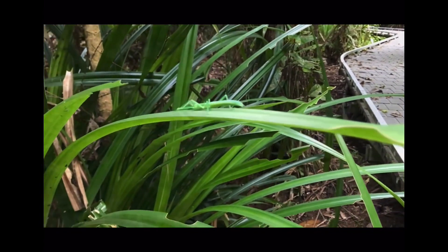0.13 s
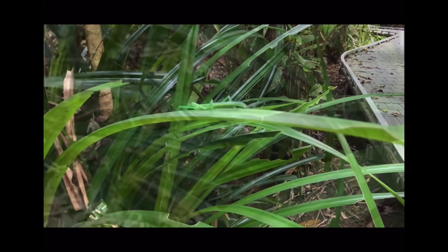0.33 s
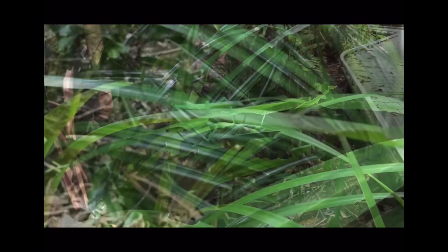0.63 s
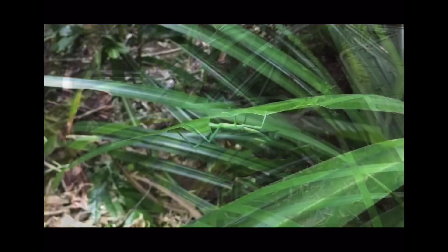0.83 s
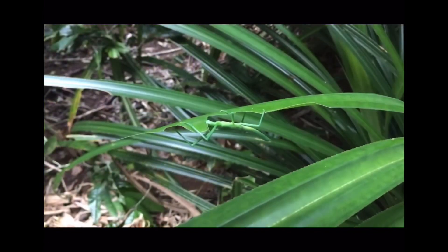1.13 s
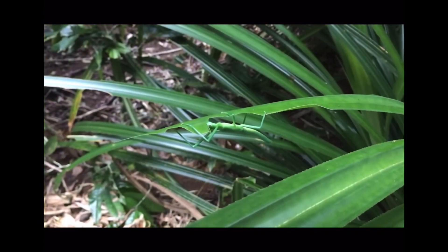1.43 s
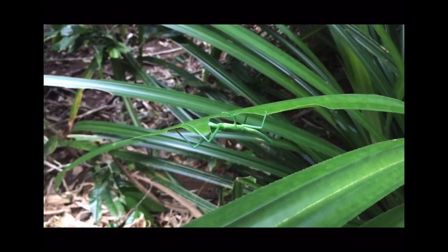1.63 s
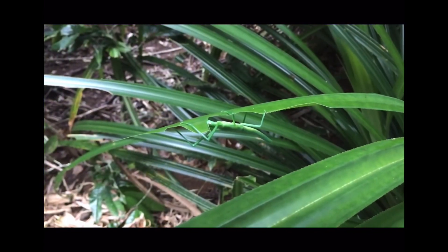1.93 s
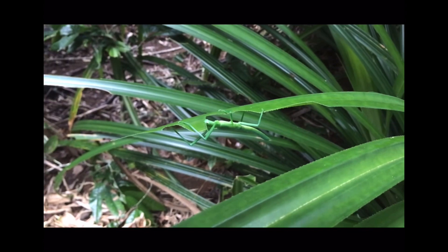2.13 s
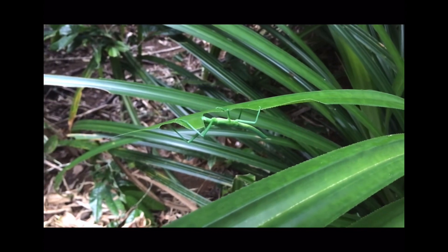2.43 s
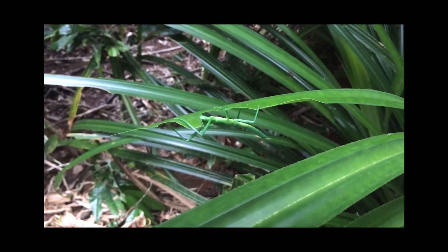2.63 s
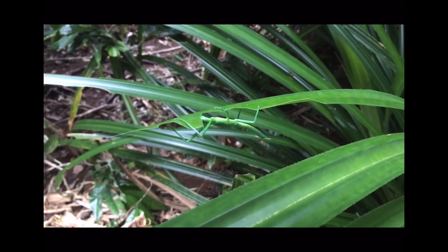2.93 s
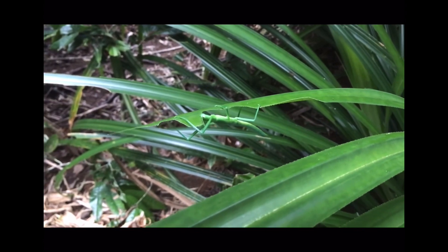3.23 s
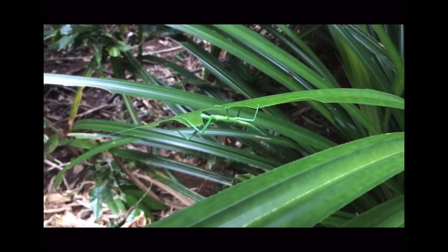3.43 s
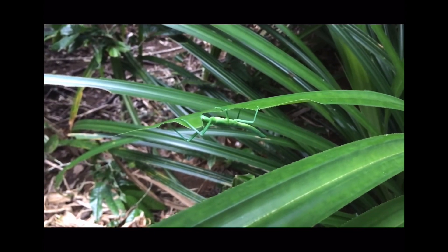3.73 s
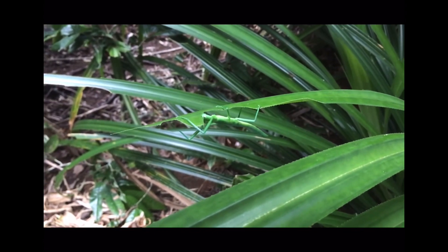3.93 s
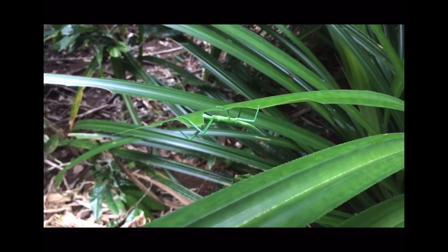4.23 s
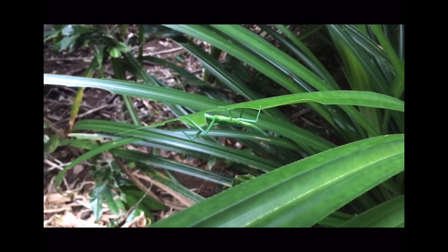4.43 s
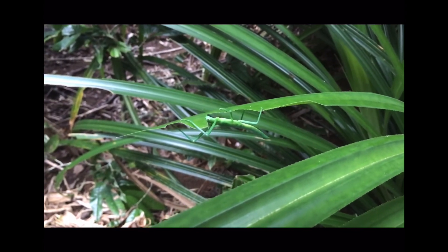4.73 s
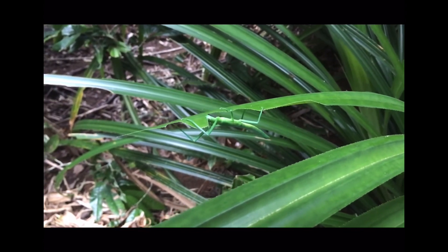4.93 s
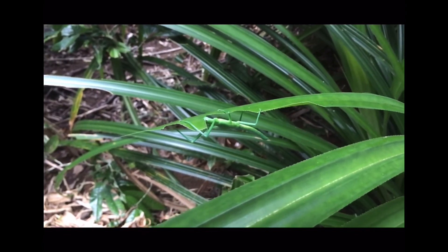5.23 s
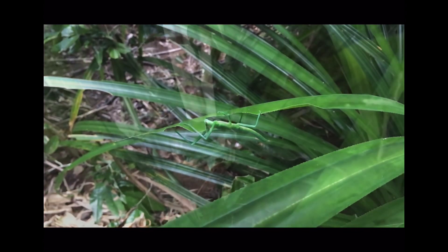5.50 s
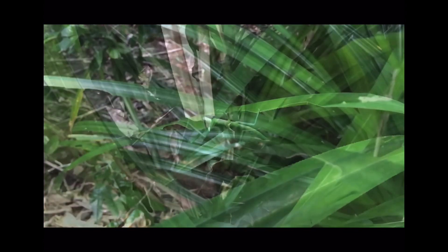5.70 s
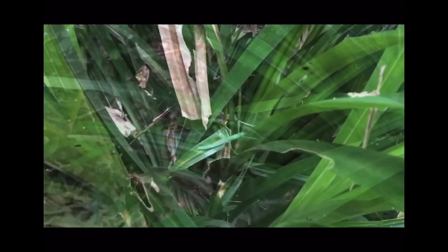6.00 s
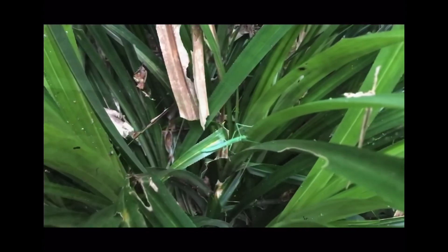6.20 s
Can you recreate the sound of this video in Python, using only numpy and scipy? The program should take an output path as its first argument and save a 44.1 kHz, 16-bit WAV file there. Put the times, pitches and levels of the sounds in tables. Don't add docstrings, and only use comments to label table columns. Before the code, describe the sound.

The opening is a quiet forest spot, soft hiss with a faint high insect band. From about 0.1 to 1.2 s it blends into a dense cicada chorus, a steady shrill drone near 9 kHz, over distant low rumble, leaf hiss and a faint narrow frog band around 2.2 kHz. Faint bird notes begin around 0.7 s; busy clusters of short whistles, falling slurs and hoarse chatter fill 1.6 to 3.6 s, strongest near 2.2 and 2.6 s. After a lull, more chirps come at 4.0 to 4.4 s, and a descending whistle run at 4.8 to 5.0 s, all echoing off trees. At 5.12 s a close cicada bursts in, louder, buzzing with distinct dry ticks. It weakens from 5.6 s and is gone by about 6.3 s. Meanwhile, trilled bird notes sound near 5.8 s and the ambience crossfades to low rumble under thinner, higher insects.

```python
import sys
import numpy as np
from scipy import signal
from scipy.fft import rfft, irfft
from scipy.io import wavfile
from scipy.ndimage import uniform_filter1d

SR = 44100
rng = np.random.default_rng(int(sys.argv[2]) if len(sys.argv) > 2 else 0)


def undo_db(level):
    steps = np.asarray(level, float) / 20
    return 10 ** steps


def persist_wave(psi):
    counts = np.round(np.clip(psi, -1, 1) * 32767).astype(np.int16)
    wavfile.write(sys.argv[1], SR, np.atleast_2d(counts).T)


N = 280476


def rms_one(x):
    return x / np.sqrt(np.mean(x ** 2) + 1e-20)


def ramp(start_s, end_s):
    return np.clip((np.arange(N) / SR - start_s) / (end_s - start_s), 0, 1)


def drift(rate_hz):
    step = 40
    pole = np.exp(-2 * np.pi * rate_hz * step / SR)
    settle = 2000
    noise = rng.standard_normal(N // step + 2 + settle)
    slow = signal.lfilter([1], [1, -2 * pole, pole * pole], noise)[settle:]
    return np.interp(np.arange(N) / step, np.arange(len(slow)), rms_one(slow))


def colour(x, spectrum, rings=()):
    hz = np.arange(N // 2 + 1) * SR / N + 1e-3
    points = np.array(spectrum)
    level_db = np.interp(np.log(hz), np.log(points[:, 0]), points[:, 1], left=-150)
    for centre_hz, width_hz, ring_db in rings:
        level_db = level_db + ring_db / (1 + (2 * (hz - centre_hz) / width_hz) ** 2)
    return rms_one(irfft(rfft(x) * undo_db(level_db), N))


def hiss(spectrum, patchy_db):
    return colour(rng.standard_normal(N), spectrum) * undo_db(patchy_db * drift(5.4))


def foliage(x, ragged_db):
    ripple = rng.standard_normal(N // 2 + 1)
    for _ in range(2):
        ripple = uniform_filter1d(ripple, size=90)
    return rms_one(irfft(rfft(x) * undo_db(ragged_db * rms_one(ripple)), N))


def tymbals(rates_hz, jitter, uneven_db, burst_s):
    clicks = np.zeros(N)
    for rate_hz in rates_hz:
        turns = np.cumsum(rate_hz * (1 + jitter * drift(8))) / SR
        buckles = np.diff(np.floor(turns), prepend=0)
        clicks += buckles * undo_db(uneven_db * rng.standard_normal(N))
    power = signal.lfilter([1], [1, -np.exp(-1 / (burst_s * SR))], clicks)
    return np.sqrt(power) * rng.standard_normal(N)


def chorus():
    # frequency_hz, density_db (per Hz)
    spectrum = [(4000, -48), (6800, -27.5), (7190, -24.5), (7660, -11.5), (8090, -2.5), (8940, 0),
                (9600, -2.5), (10500, -17), (11200, -32), (14600, -49), (22000, -120)]
    # centre_hz, width_hz, ring_db
    rings = [(8371, 30, 5), (8230, 25, 3), (8519, 30, 3), (9238, 25, 4), (9286, 25, 5), (9485, 50, 3),
             (9641, 25, 4), (9970, 25, 5), (7715, 30, 3)]
    rates_hz = [88.5, 89.5, 113, 177, 179, 227, 301, 343, 376, 446]
    clicks = tymbals(rates_hz, jitter=.01, uneven_db=2, burst_s=.0015)
    song = foliage(colour(clicks, spectrum, rings), ragged_db=2.2)
    return undo_db(-44 + .3 * drift(4)) * song


def close_cicada():
    # frequency_hz, density_db (per Hz)
    spectrum = [(3470, -63), (5900, -38), (7020, -24.5), (7350, -24), (7410, -19), (8070, -5.5),
                (8590, -3.5), (9320, -6), (9810, -12), (10100, -34), (10200, -17), (11300, -50),
                (14700, -67), (22000, -120)]
    # centre_hz, width_hz, ring_db
    rings = [(8366, 35, 8), (8274, 30, 5), (8581, 35, 4), (9022, 40, 5), (9469, 35, 6), (7704, 40, 6),
             (7951, 25, 4), (8048, 25, 4)]
    # time_s, level_db
    song = [
        (5.121, -37),
        (5.15, -33),
        (5.4, -34),
        (5.565, -35.5),
        (6.029, -43.5),
        (6.295, -57.5),
        (6.3, -63),
    ]
    ticks = [5.1216, 5.1227, 5.1242, 5.136, 5.1424, 5.1528, 5.1597, 5.1689, 5.1766, 5.186, 5.1941, 5.2241,
             5.2284, 5.2481, 5.2563, 5.2906, 5.2971, 5.3049, 5.3166, 5.3208, 5.3888, 5.3966, 5.4031, 5.4109,
             5.4374, 5.4418, 5.448, 5.4971, 5.5039, 5.5147, 5.5383, 5.5523, 5.5933, 5.6483, 5.7056, 5.7513]
    clicks = rms_one(tymbals([110.5, 120, 151.0, 268, 263, 287], jitter=0.018, uneven_db=2, burst_s=0.005))
    tick_db = 18 + 1.5 * rng.standard_normal(len(ticks))
    clicks[(np.array(ticks) * SR).astype(int)] += undo_db(tick_db)
    time_s, song_db = np.transpose(song)
    level_db = np.interp(np.arange(N) / SR, time_s, song_db)
    gate = ramp(5.12, 5.122) * (1 - ramp(6.291, 6.36))
    return gate * undo_db(level_db + 0.55 * drift(4.4)) * foliage(colour(clicks, spectrum, rings), ragged_db=2.5)


def note(row, sag, hoarse_hz, depth=0):
    start_s, length_s, pitch_hz, level_db = row
    return start_s, length_s, pitch_hz, pitch_hz * (1 - sag), level_db, hoarse_hz, depth


def notes():
    # start_s, length_s, pitch_hz, level_db
    pipes = [(0.74, 0.036, 2470, -61), (0.905, 0.03, 3970, -61), (1.263, 0.063, 4640, -56),
             (1.25, 0.19, 3190, -67), (1.599, 0.048, 2297, -53.5), (3.21, 0.035, 2880, -51.5),
             (2.038, 0.029, 4570, -57), (2.232, 0.047, 4226, -44.5), (2.24, 0.03, 5190, -61),
             (2.557, 0.036, 3010, -41.5), (2.563, 0.038, 1910, -62), (2.606, 0.04, 2930, -50.5),
             (2.654, 0.039, 3010, -45.5), (2.797, 0.067, 2790, -65), (2.986, 0.058, 2892, -46.5),
             (3.125, 0.065, 2640, -51.5), (3.127, 0.044, 1640, -62), (3.393, 0.06, 2820, -57.5),
             (3.425, 0.044, 3830, -50), (4.132, 0.063, 2770, -58), (4.3, .022, 1930, -59),
             (4.383, 0.038, 4256, -48.5), (4.384, 0.05, 2117, -55), (4.716, 0.048, 5850, -63),
             (4.773, 0.014, 4320, -43), (5.403, 0.025, 4150, -51.5), (5.428, 0.11, 2970, -65),
             (5.59, 0.037, 4620, -59), (4.01, 0.037, 2900, -69)]
    # start_s, length_s, pitch_hz, level_db
    slurs = [(1.082, .03, 3400, -60), (1.577, 0.033, 4400, -56.5), (1.871, 0.032, 6000, -57),
             (1.901, 0.025, 4780, -52), (2.698, 0.044, 2865, -45.5), (2.745, 0.052, 2850, -44),
             (2.758, 0.042, 4290, -54), (1.975, 0.02, 4250, -54), (3.069, 0.046, 2780, -53.5),
             (3.96, 0.014, 3200, -51), (4.333, 0.044, 2350, -55), (4.432, 0.035, 4250, -61),
             (4.79, 0.023, 4330, -51)]
    # start_s, length_s, pitch_hz, level_db
    trills = [
        (0.927, 0.047, 4330, -51),
        (3.996, 0.09, 4380, -53),
        (5.781, 0.106, 4350, -49),
        (5.894, 0.044, 4240, -48.5),
    ]
    # start_s, length_s, pitch_hz, level_db
    husky = [(1.92, 0.022, 3030, -50.5), (2.167, 0.036, 3450, -66), (2.225, 0.035, 3400, -50),
             (2.226, 0.083, 3840, -51.5), (2.381, 0.098, 4170, -56), (2.635, 0.19, 5870, -60),
             (3.044, 0.041, 2730, -50), (0.968, .09, 4245, -61.5), (1.634, 0.11, 4280, -70),
             (3.148, 0.062, 3310, -58), (3.191, 0.056, 4170, -56), (4.014, 0.024, 4630, -55),
             (4.311, 0.12, 4374, -53), (4.303, 0.151, 3820, -57.5), (4.697, 0.098, 2920, -59.5),
             (4.458, 0.24, 3760, -71), (4.685, 0.21, 3740, -58), (4.892, 0.12, 4380, -65),
             (5.371, 0.17, 3760, -56.5), (5.693, 0.1, 2666, -58.5), (5.759, 0.084, 3800, -57),
             (5.827, 0.091, 2890, -56.5)]
    # start_s, length_s, pitch_hz, level_db
    chatter = [(1.047, 0.32, 5480, -67.5), (1.352, 0.22, 4100, -63), (1.957, 0.033, 4900, -56),
               (2.299, 0.1, 3485, -53.5), (2.582, 0.068, 2720, -49), (6.018, 0.014, 5380, -46.5),
               (2.973, 0.076, 4110, -57.5), (3.053, 0.088, 5200, -66), (3.103, 0.16, 3080, -56.5),
               (3.362, 0.15, 5850, -64), (3.374, 0.17, 3200, -59), (4.304, 0.13, 15600, -74),
               (4.311, 0.084, 5000, -54.5), (4.331, 0.112, 2680, -58.5), (4.758, 0.27, 5920, -66),
               (4.882, 0.16, 2930, -60.5), (4.88, .1, 15600, -70), (5.052, 0.047, 3580, -74),
               (5.758, 0.14, 5070, -56.5)]
    # start_s, first_hz, last_hz, level_db
    strokes = [(3.598, 3810, 3740, -51.5), (2.665, 4160, 4200, -54), (2.693, 4340, 4660, -47),
               (2.79, 4890, 4630, -58), (3.07, 2390, 1700, -58), (1.945, 3990, 3600, -53),
               (2.601, 2850, 2100, -49), (3.624, 3990, 2250, -48.5), (4.097, 4150, 4580, -58),
               (4.313, 4350, 4650, -54), (4.693, 3170, 3020, -58), (4.783, 2690, 2210, -53),
               (5.031, 3320, 2200, -55)]
    # start_s, length_s, first_hz, last_hz, level_db
    glides = [(1.843, 0.024, 3750, 3450, -56), (1.843, 0.031, 3230, 2950, -54),
              (1.893, 0.01, 3500, 4300, -58), (1.897, 0.038, 4270, 4150, -47.5),
              (1.932, .028, 4560, 4250, -49), (2.155, 0.02, 4220, 4150, -51.5),
              (2.179, 0.051, 4060, 3740, -49.5), (2.225, 0.015, 3600, 4300, -46),
              (2.197, 0.014, 3450, 3300, -46.5), (2.21, .05, 3100, 2950, -54),
              (3.575, 0.05, 3000, 3400, -61), (2.716, 0.038, 4320, 4000, -48),
              (3.368, 0.024, 4560, 4400, -54), (3.391, 0.05, 4300, 4050, -53),
              (3.47, 0.03, 4350, 4200, -57), (3.535, .03, 4200, 4050, -57), (3.51, .016, 3320, 3600, -54),
              (3.57, 0.03, 3850, 3800, -59), (4.808, .022, 3750, 3650, -53), (4.837, .042, 4400, 4130, -51),
              (4.897, 0.045, 4030, 3850, -52), (4.941, 0.026, 3850, 3750, -46.5),
              (4.972, 0.032, 3720, 3520, -46), (5.008, 0.034, 3600, 3320, -44.5),
              (4.328, 0.029, 4520, 4420, -50.5), (4.354, 0.023, 4400, 4220, -51),
              (1.568, 0.037, 2340, 2340, -54), (4.716, 0.044, 2740, 2340, -58),
              (1.595, 0.045, 4260, 4250, -56), (1.65, 0.046, 4230, 4220, -58), (.772, .04, 4900, 4850, -69),
              (.82, .02, 4200, 4150, -66), (3.505, .022, 4200, 4150, -54), (4.345, .014, 2500, 2680, -49),
              (1.883, 0.019, 2850, 3150, -53), (2.162, 0.034, 3420, 3380, -61), (2.3, .02, 3700, 2400, -58),
              (2.335, 0.03, 2250, 2230, -60), (4.737, .034, 4330, 4200, -49)]
    # start_s, length_s, pitch_hz, level_db
    far_calls = [(4.95, .65, 1350, -73), (2.6, 0.29, 1330, -77), (3.2, .2, 1200, -77),
                 (4.1, .04, 2550, -63), (1.225, 0.042, 4620, -64), (1.37, 0.058, 3120, -64),
                 (1.955, .03, 3300, -56), (1.97, .012, 5850, -60), (1.74, .06, 5900, -66),
                 (2.3, .05, 5850, -62), (4.93, .04, 4300, -60), (3.15, .03, 3250, -58),
                 (3.1, .012, 2850, -52), (2.83, 0.055, 2800, -57)]
    calls = [note(row, sag=0.0163, hoarse_hz=28) for row in pipes]
    calls += [note(row, sag=0.0693, hoarse_hz=50) for row in slurs]
    calls += [note(row, sag=0.055, hoarse_hz=100, depth=.7) for row in trills]
    calls += [note(row, sag=.05, hoarse_hz=140) for row in husky]
    calls += [note(row, sag=.035, hoarse_hz=350.5) for row in chatter]
    stroke_s = 0.025
    calls += [(start_s, stroke_s, first, last, db, 45, 0) for start_s, first, last, db in strokes]
    calls += [(*row, 45, 0) for row in glides]
    calls += [note(row, sag=0.0163, hoarse_hz=45) for row in far_calls]
    return calls


def scatter(t60_s, size):
    tail = rng.standard_normal(size) * undo_db(-60 * np.arange(size) / SR / t60_s)
    bins = rfft(tail)
    smooth = np.sqrt(uniform_filter1d(abs(bins) ** 2, size=17))
    tail = irfft(bins / smooth, size)
    tail = tail * np.hanning(2 * size)[size:]
    return tail / np.sqrt(np.sum(tail ** 2))


def birds():
    direct = np.zeros(N)
    shake = rms_one(signal.lfilter([1], [1, -.96], rng.standard_normal(N)))
    waver_hz = 22 * drift(50)
    flutter = undo_db(4 * np.tanh(1.5 * drift(70)))
    calls = notes()
    own = rng.integers(0, N - SR, len(calls))
    trill_per_s = 33.5
    for (start_s, length_s, first_hz, last_hz, level_db, hoarse_hz, depth), skip in zip(calls, own):
        at = round(start_s * SR)
        part = np.arange(round(length_s * SR)) / (length_s * SR)
        span, luck = slice(at, at + len(part)), slice(skip, skip + len(part))
        hz = first_hz + (last_hz - first_hz) * part
        hz = hz + waver_hz[luck] + 1.507 * hoarse_hz * shake[luck]
        attack, release = part * length_s / 0.0021, (1 - part) * length_s / 0.0086
        swell = np.clip(np.minimum(attack, release), 0, 1)
        swell = swell * (1 - depth * np.cos(np.pi * trill_per_s * length_s * part) ** 2)
        swell = swell * flutter[luck] ** min(1, length_s / 0.074)
        direct[span] += undo_db(level_db) * swell * np.sin(2 * np.pi * np.cumsum(hz) / SR)
    echoes = signal.fftconvolve(direct, scatter(t60_s=.5, size=26000))[:N]
    return direct + undo_db(-2 + 1.5 * drift(60)) * echoes


def background():
    # frequency_hz, density_db (per Hz)
    rumble = [(13, -56), (22, -34), (29, -29), (41, -7), (70, 2.5), (107, -1), (146, -1), (181, -3),
              (313, -5), (419, -12), (792, -12), (883, -17.5), (967, -19.5), (1700, -20), (2210, -39),
              (3740, -120)]
    leaves = [(1000, -21), (1700, -18), (1890, -5), (2220, -0.5), (2570, -3), (2800, -3.5), (2970, -4.5),
              (3690, -4.5), (4330, -5), (5210, -10.5), (5720, -6.5), (6330, -16), (7000, -12.5),
              (9100, -29), (15400, -120)]
    frogs = [(1900, -33), (2080, 7.5), (2230, 16.5), (2400, -2), (2600, -8), (3000, -96)]
    air = [(6470, -41), (11000, 0), (11600, -7.5), (13300, -2), (15500, -13.5)]
    bed = undo_db(-54.5) * hiss(rumble, patchy_db=0.7)
    bed += undo_db(-58.5) * hiss(leaves, patchy_db=2.0)
    frog_ring = [(2224, 12, 5)]   # centre_hz, width_hz, ring_db
    bed += undo_db(-65 + 1.2 * drift(35)) * colour(rng.standard_normal(N), frogs, frog_ring)
    return bed + undo_db(-66.5 + 0.84 * drift(12)) * hiss(air, patchy_db=0)


def quiet_spot():
    # frequency_hz, density_db (per Hz)
    spectrum = [(15, -39), (25, -11), (76, -3.5), (141, -11), (181, -16.5), (258, -16.5), (309, -23),
                (751, -26.5), (874, -32), (1040, -29), (1380, -30.5), (5040, -34), (7010, -32), (9760, -21),
                (10800, -44), (12000, -60), (14000, -52), (15700, -55), (22000, -120)]
    return undo_db(-54.5) * hiss(spectrum, patchy_db=1.0)


def last_spot():
    # frequency_hz, density_db (per Hz)
    bed = [(15, -37), (25, -24), (55, 2.5), (160, -0.5), (316, -7), (393, -10.5), (760, -13), (838, -17),
           (1040, -17), (1500, -18.5), (3890, -17), (5750, -17.5), (8500, -30), (11000, -65), (18700, -120)]
    insects = [(5000, -50), (8500, -21), (8960, -19), (9350, 4.5), (9640, -0.5), (10300, -6), (10600, -22),
               (11000, -14), (11400, -67), (12900, -21), (15500, -33)]
    # centre_hz, width_hz, ring_db
    ring = [(9650, 130, 6.5)]
    song = colour(rng.standard_normal(N), insects, ring)
    return undo_db(-45.5) * hiss(bed, patchy_db=.8) + undo_db(-44) * song


def scene():
    arrive, leave = ramp(0.14, 1.236), ramp(5.22, 6.44)
    main = arrive * (1 - leave) ** 0.89 * undo_db(0.23) * (background() + chorus())
    main = main + birds() + close_cicada()
    quiet = (1 - arrive) ** 1.4 * quiet_spot()
    last = leave * undo_db(-1.26) * last_spot()
    return (main + quiet + last)[None]


def roll_off(x):
    return signal.sosfilt(signal.butter(12, 15720, fs=SR, output="sos"), x)


def record(dry):
    heard = signal.sosfilt(signal.butter(4, 36, "high", fs=SR, output="sos"), dry)
    return roll_off(heard)


dry = scene()
out = record(dry)
persist_wave(out)
```